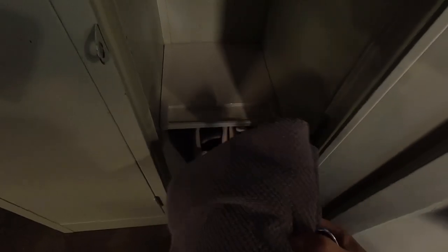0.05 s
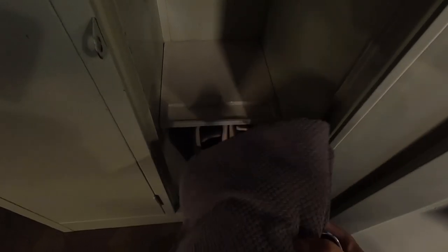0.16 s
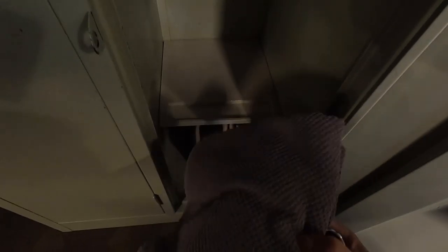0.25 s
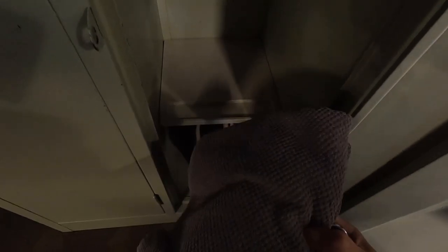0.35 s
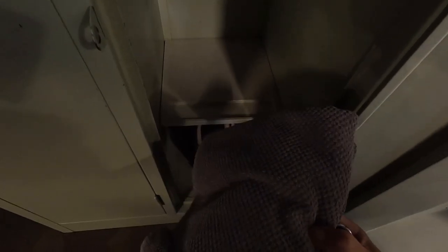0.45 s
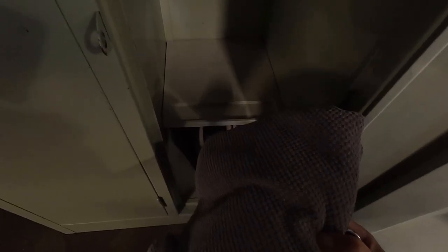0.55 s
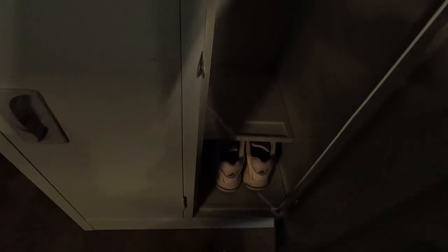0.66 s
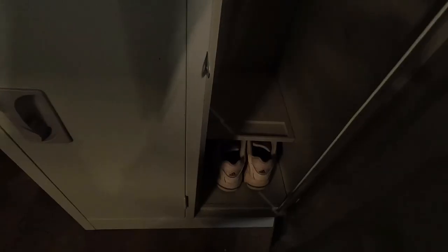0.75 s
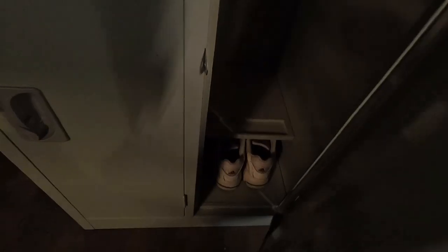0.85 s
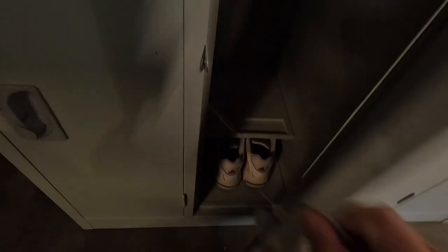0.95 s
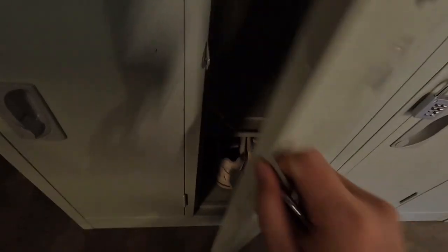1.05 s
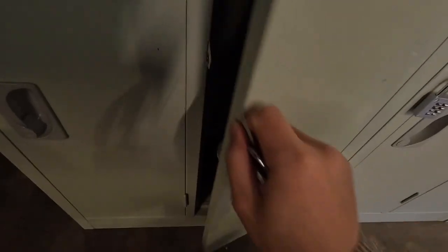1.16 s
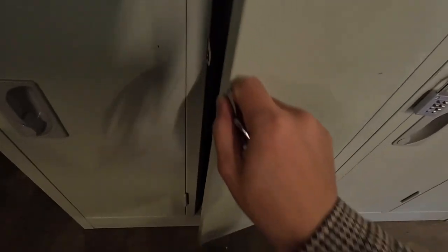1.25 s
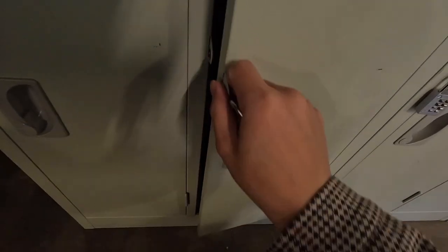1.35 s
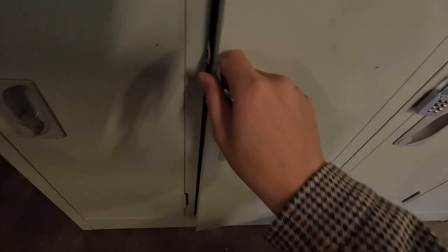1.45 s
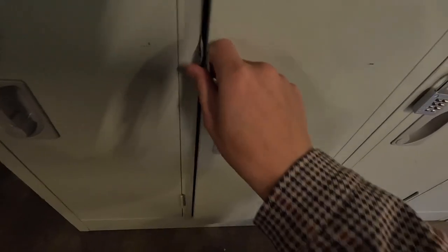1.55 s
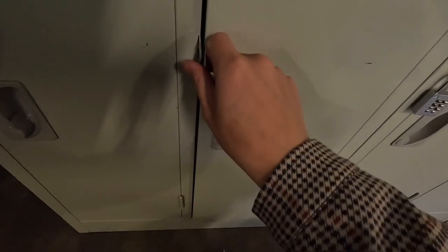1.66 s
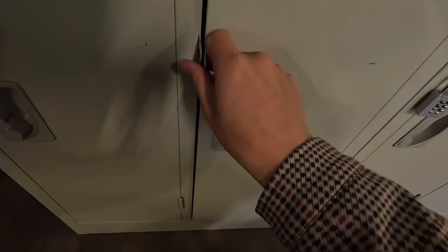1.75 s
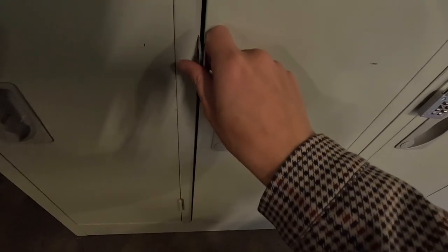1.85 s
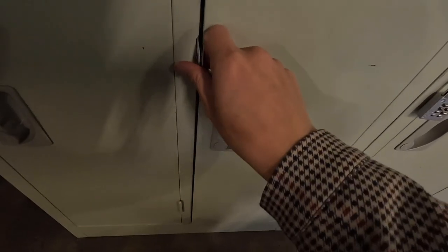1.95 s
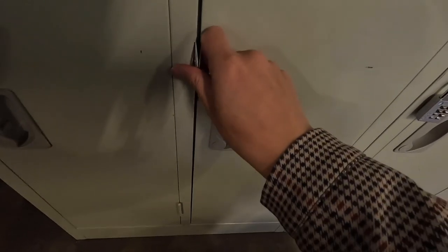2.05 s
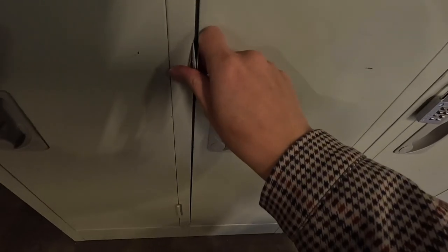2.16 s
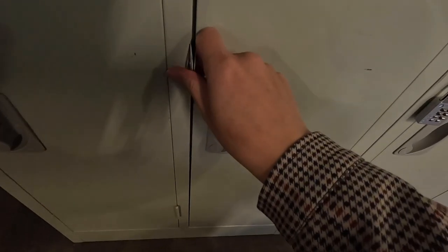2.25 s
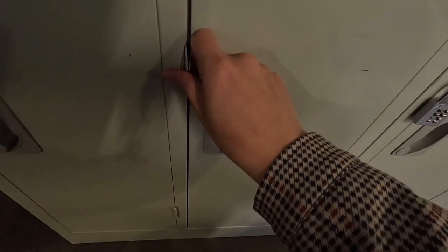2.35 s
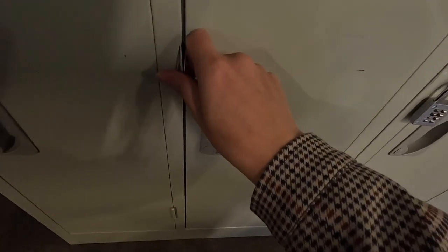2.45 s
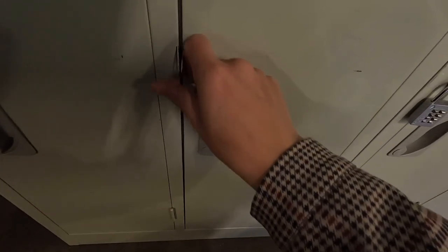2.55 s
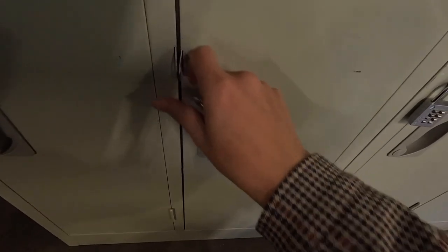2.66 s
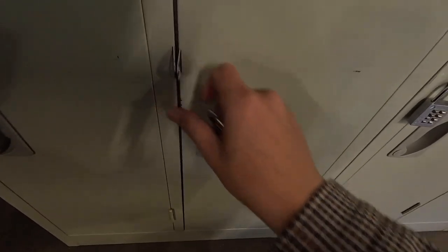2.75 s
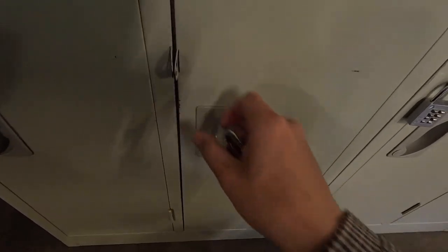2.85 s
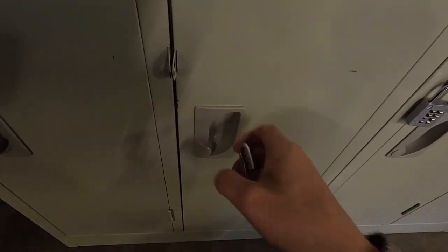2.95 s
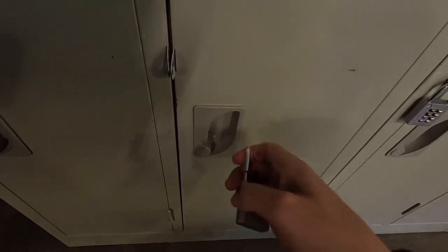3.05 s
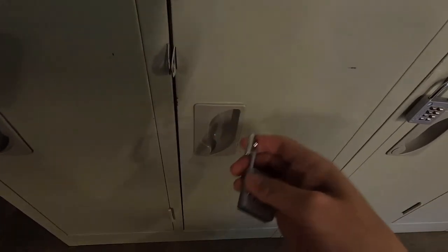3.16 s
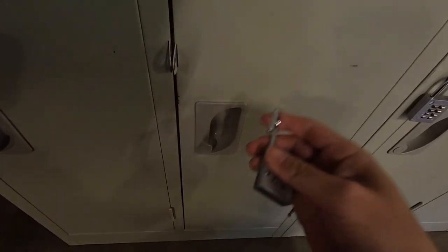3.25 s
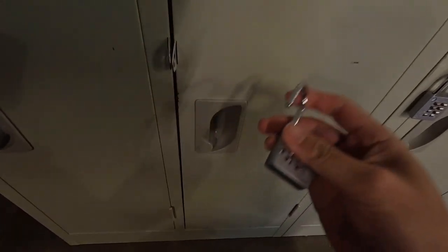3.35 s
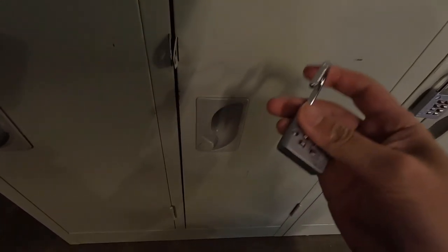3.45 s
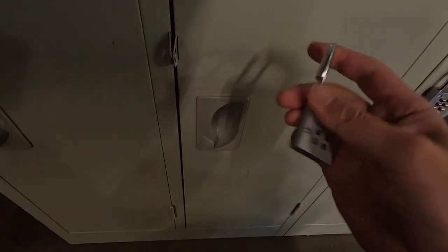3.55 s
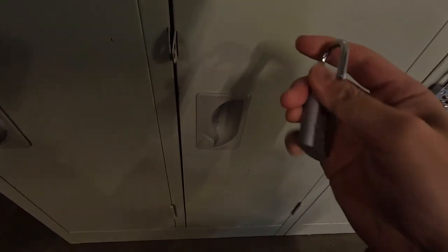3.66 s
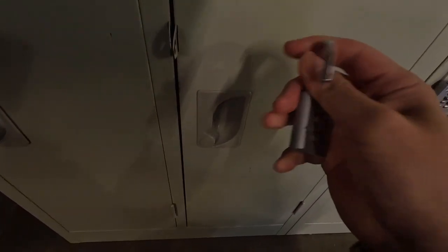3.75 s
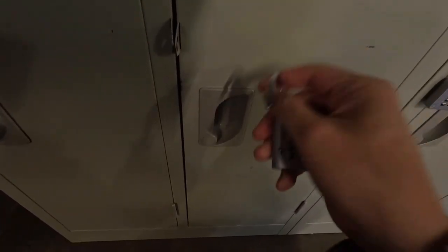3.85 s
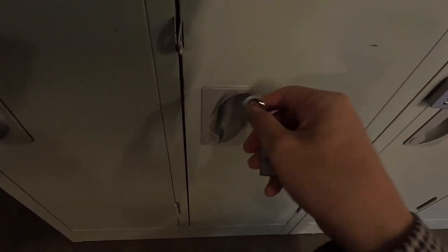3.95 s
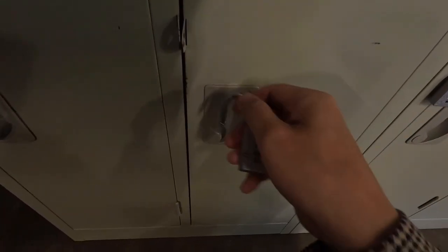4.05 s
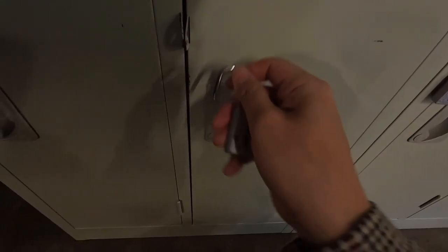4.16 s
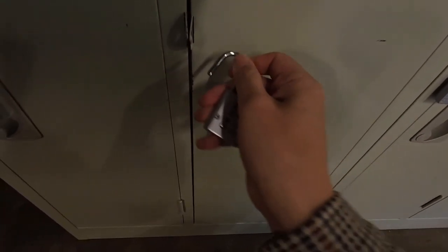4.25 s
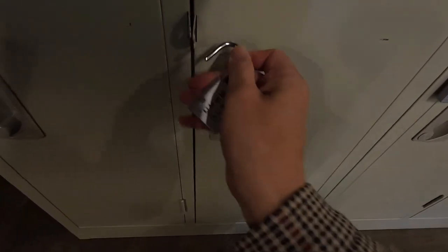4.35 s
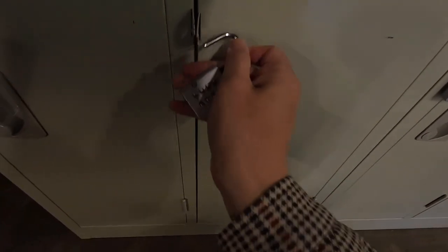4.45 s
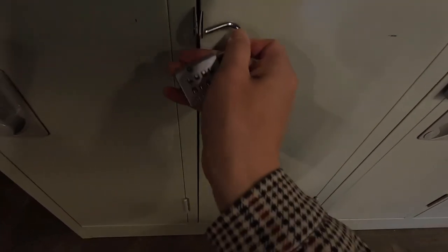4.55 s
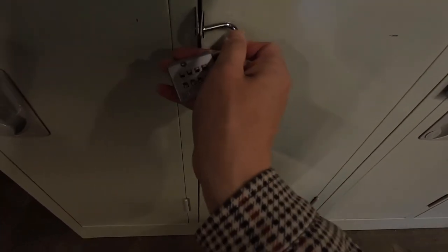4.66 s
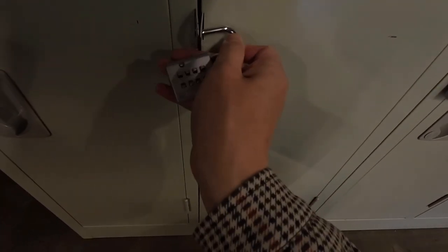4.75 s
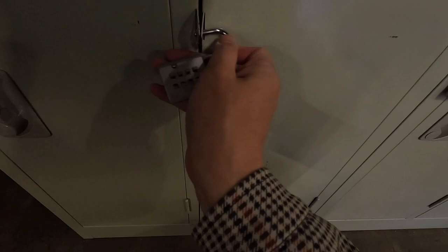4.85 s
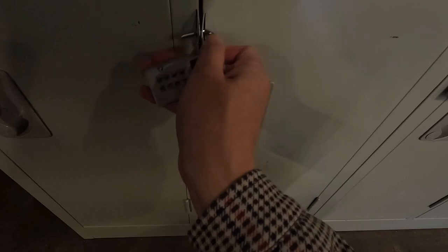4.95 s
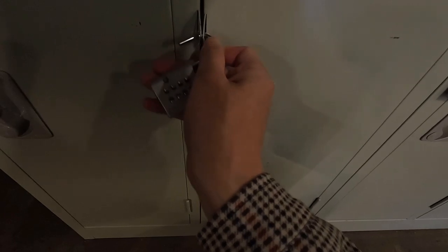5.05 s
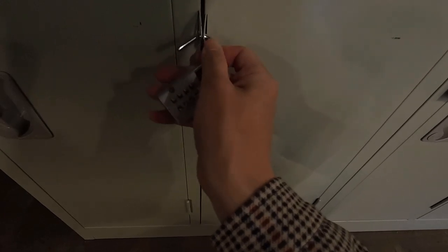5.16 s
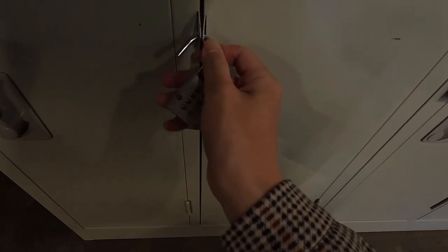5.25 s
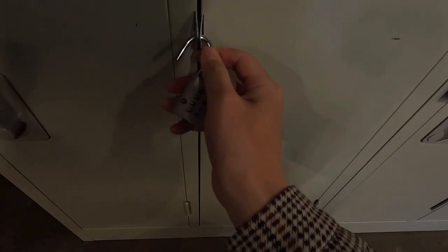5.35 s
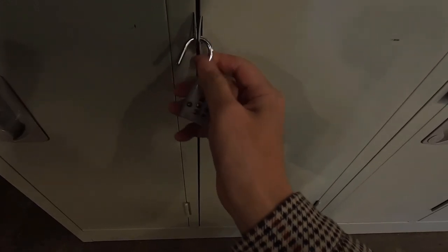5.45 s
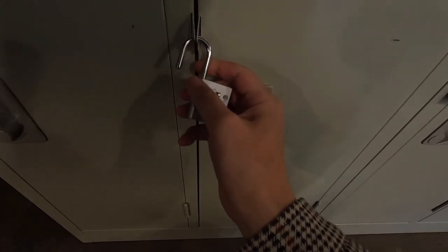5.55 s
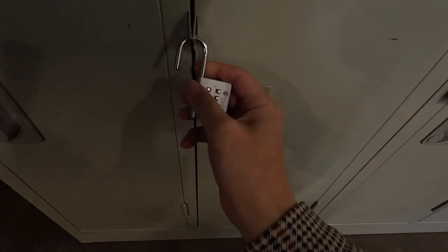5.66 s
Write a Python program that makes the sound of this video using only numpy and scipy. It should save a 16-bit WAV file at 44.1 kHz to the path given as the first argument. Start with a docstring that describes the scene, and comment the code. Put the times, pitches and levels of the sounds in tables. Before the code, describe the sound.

Faint air rumble and cloth movement, then a locker door swings with a brief thin squeak and metallic knocks. It thuds against its frame and is pressed shut with several rapid, boomy clanging hits. Afterwards come only light, dry steel clicks of a padlock being handled, with a couple of soft hollow taps on the door. Close microphone, short indoor reverberation.

```python
"""A small hard room with a low ventilation rumble, heard close up while a sleeve rustles.
A sheet-metal locker door swings on a squeaky hinge, bumps its frame and is pushed shut with a rattling bang.
A combination padlock clicks in the hand, then knocks on the door as its shackle is threaded through the hasp.
Struck metal is decaying sine modes and noise bands; the squeak is a gliding sine.
Rubbing, cloth and air are shaped noise."""
import sys
import numpy as np
from scipy import signal
from scipy.fft import rfft, irfft
from scipy.io import wavfile
from scipy.ndimage import uniform_filter1d

SR = 44100
rng = np.random.default_rng(int(sys.argv[2]) if len(sys.argv) > 2 else 0)


def put_to_file(sound):
    """Save the sound as 16-bit audio at rate SR, in the file named by the first command-line argument."""
    columns = np.atleast_2d(sound).T  # one column per channel
    safe = np.clip(columns, -1, 1)
    whole_steps = np.round(safe * 32767)
    wavfile.write(sys.argv[1], SR, whole_steps.astype(np.int16))


N = 251370
TIME = np.arange(N) / SR
RING_TIME = TIME[:SR]

# Dense ring of the thin sheet:
# (frequency [Hz], relative level [dB], t60 [s], time constant of the build-up [ms])
SHEET_RING = [(90, -10, 1, 18), (162, 0.5, 0.21, 7.8), (320, -5, 0.46, 21), (497, -5.5, 0.28, 14),
              (1000, -5.5, 0.21, 7.2), (1720, -5.5, 0.23, 2.5), (2580, -7.5, 0.17, 1.2),
              (5100, -7.5, 0.18, 1), (7300, -9.5, 0.083, 1), (9470, -31, 0.23, 0.89), (12600, -23, 0.2, 1),
              (16000, -44.5, .15, 1)]


def amp(db):
    """Decibels to gain."""
    return 10 ** (np.asarray(db) / 20)


def at_pitch(rows, hz):
    """The columns of a frequency table, read on a log axis."""
    table_hz, *columns = np.transpose(rows)
    log_hz = np.log(np.maximum(hz, 1))
    return [np.interp(log_hz, np.log(table_hz), column) for column in columns]


def unit(x):
    """Scale to rms 1."""
    return x / np.sqrt(np.mean(x ** 2))


def add(out, s, sound):
    """Mix a sound in at time s."""
    i = int(s * SR)
    n = min(sound.shape[-1], N - i)
    out[:, i:i + n] += sound[..., :n]


def noise(size, gain, wider_db=0):
    """Stereo noise with the spectrum gain(Hz): alike in the bass, wider in the treble."""
    # Stereo width before wider_db and the -3 dB ceiling: (frequency [Hz], side minus mid [dB])
    stereo_width = [(60, -33), (200, -26), (700, -17), (1300, -14), (2500, -7), (8000, -9), (15000, -6)]
    hz = np.fft.rfftfreq(size, 1 / SR)
    mid, side = rfft(rng.standard_normal((2, size))) * gain(hz)
    side = side * amp(np.minimum(at_pitch(stereo_width, hz)[0] + wider_db, -3))
    return unit(irfft(np.array([mid + side, mid - side]), size))


def band(centre_hz, octaves):
    """A flat-topped band with steep edges, as a gain function."""
    return lambda hz: np.exp(-(2 * np.log2((hz + 1) / centre_hz) / octaves) ** 4 / 2)


def fade(t, t60):
    """Exponential decay by 60 dB in t60 seconds."""
    return np.exp(-np.log(1000) * t / t60)


def build_up(ms):
    """Gradual onset of a ring, with its time constant in ms."""
    return 1 - np.exp(-RING_TIME * 1000 / ms)


def ring(hz, t60, t=RING_TIME):
    """One struck mode: a decaying sine."""
    return np.sin(2 * np.pi * hz * t) * fade(t, t60)


def walk(rate):
    """Smooth random drift with a spread of 1, taking about rate new values a second."""
    k = max(int(SR / rate), 1)
    steps = np.repeat(rng.standard_normal(N // k + 1), k)
    return unit(uniform_filter1d(steps, k)[:N])


def strokes(rows, attack_s, release_s):
    """Gain of (start, length, dB) movements: each swells, holds and dies away by 60 dB in release_s."""
    power = 0
    for s, length, db in rows:
        rise = np.clip((TIME - s) / attack_s, 0, 1)
        fall = fade(np.maximum(TIME - s - length, 0), release_s)
        power = power + (amp(db) * rise * fall) ** 2
    return np.sqrt(power)


def air(level_db=-45.5, swell_db=0.4, wider_db=11):
    """Diffuse ventilation rumble: wide noise, gently uneven in level."""
    # Rumble spectrum: (frequency [Hz], relative level [dB])
    rumble = [(12, -46), (20, 6.5), (42, 1), (62, -5.5), (97, -4.5), (128, -9.5), (281, -5), (350, -7.5),
              (412, -19), (447, -10), (655, -27.5), (1800, -24.5), (2780, -37), (3960, -44.5),
              (9220, -54.5), (11800, -54.5), (13500, -76.5)]
    spectrum = lambda hz: amp(at_pitch(rumble, hz)[0])
    return noise(N, spectrum, wider_db) * amp(level_db + swell_db * walk(2.5))


def room(x, wet_db, low_t60=0.37, high_t60=0.35, gap_s=0.0053):
    """Lockers and hard walls return a short diffuse tail, its lows and highs fading separately."""
    low = noise(SR, lambda hz: 1 / (1 + (hz / 600) ** 2)) * fade(RING_TIME, low_t60)
    high = noise(SR, lambda hz: hz / (hz + 500) / (1 + (hz / 11000) ** 2)) * fade(RING_TIME, high_t60)
    # silent for one gap, then rising over another
    tail = (0.39 * low + high) * np.clip(RING_TIME / gap_s - 1, 0, 1)
    return amp(wet_db) * signal.fftconvolve(x, tail / np.linalg.norm(tail[0]), axes=1)[:, :N]


def sleeve(grain_db=2.0, rest_db=-72, silk_share_db=-17.5):
    """Woven cloth rustles as the arm moves; its smooth lining adds a high silky hiss."""
    # Arm movements that ruffle the sleeve: (start [s], length [s], level [dB])
    arm_moves = [(0, 0.14, -66.5), (.62, 0.67, -65), (2.95, 0.21, -68), (3.95, 0.32, -63.5),
                 (4.6, 0.47, -71.5)]
    # Forward reaches that slide the lining: (start [s], length [s], level [dB])
    reaches = [(1.75, 0.29, -72.5), (4.5, 0.49, -73.5)]
    cloth = np.hypot(amp(rest_db), strokes(arm_moves, attack_s=0.017, release_s=1.0))
    sliding = np.hypot(amp(silk_share_db) * cloth, strokes(reaches, attack_s=0.094, release_s=1.5))
    rustle = noise(N, band(4100, 1.79)) * cloth * amp(grain_db * walk(49))
    silk = noise(N, band(12100, .15)) + .6 * noise(N, band(10800, .45))
    return rustle + silk * sliding * amp(grain_db * walk(40))


def wobble(hz=26.0, drift=0.087, level_db=-3):
    """The open door quivers in the hand and fans the air: a deep sine of drifting pitch."""
    # Quivers while the door is held, pulled and swung shut:
    # (start [s], length [s], level before level_db [dB])
    quivers = [(0, 0.52, -35), (.645, 0.13, -27), (.95, .75, -30)]
    swing = np.sin(2 * np.pi * np.cumsum(hz * (1 + drift * walk(25))) / SR)
    return unit(swing) * amp(level_db) * strokes(quivers, attack_s=0.047, release_s=0.65)


def rubbing(slip_db=2.0, top_hz=6000, low_hz=500):
    """Painted steel sticks and slips, stirring the sheet in uneven spurts."""
    # Dry metal rubbing at the hinge, frame and hasp: (start [s], length [s], level [dB])
    rubs = [(.65, 0.53, -56.5), (.788, 0.027, -38.5), (.87, 0.026, -49), (1.87, .16, -53.5),
            (4.83, 0.47, -62.5)]

    def spectrum(hz):
        bass_cut = hz / (hz + low_hz)
        tilt = 1 / np.sqrt(hz + low_hz)
        return amp(at_pitch(SHEET_RING, hz)[0]) * bass_cut * tilt / (1 + (hz / top_hz) ** 2)

    sheet = noise(N, spectrum)
    slips = amp(2 * slip_db * np.tanh(walk(220) / 2))  # soft limit at twice slip_db
    return unit(sheet * slips) * strokes(rubs, attack_s=0.011, release_s=0.18)


def hinge_ticks(centre_hz=2300, octaves=1.9, t60=0.022):
    """The stuck hinge pin breaks free with short dry cracks of band noise."""
    # Cracks: (time [s], level [dB])
    cracks = [(.6640, -34), (.759, -43.5)]
    out = np.zeros((2, N))
    for s, db in cracks:
        add(out, s, amp(db) * noise(SR, band(centre_hz, octaves)) * fade(RING_TIME, t60))
    return out


def hinge(flutter_db=5.0, unsteady=0.021):
    """The dry hinge pin sings one thin, unsteady note that climbs as the door picks up speed."""
    low_hz, high_hz = 12020, 13500
    climb_at_s, climb_scale_s = 0.807, 0.0076  # midpoint and time scale of the S-shaped glide
    climb = (1 + np.tanh((TIME - climb_at_s) / climb_scale_s / 2)) / 2
    hz = low_hz + (high_hz - low_hz) * climb
    phase = 2 * np.pi * np.cumsum(hz * (1 + unsteady * walk(1500))) / SR
    squeak = (0.76, 0.038, -41)  # start [s], length [s], level [dB]
    level = strokes([squeak], attack_s=0.0032, release_s=.2)
    return unit(np.sin(phase) * amp(flutter_db * walk(570))) * level


def ticks(count=3, contact_ms=3.2, spread_db=2.5, slack=0.22):
    """The loose shackle rocks to and fro in each jiggle: light clicks, as rows for padlock()."""
    # Jiggles in the fingers:
    # (start [s], length [s], peak before random spread [dB], brightness [dB per octave])
    jiggles = [(2.948, 0.059, -40, -5), (2.991, .06, -38.5, -2), (3.44, 0.072, -53.5, 9),
               (3.642, .012, -36, 11), (3.941, 0.052, -40.5, 2), (4.039, .03, -32, 4),
               (4.209, 0.089, -36.5, 8.5), (5.204, 0.056, -46.5, -6)]
    rows = []
    for start, length, db, bright_db in jiggles:
        # each tick comes late by up to slack, a share of the gap
        times = start + length * (np.arange(count) + slack * rng.random(count)) / count
        levels = db + spread_db * rng.standard_normal(count)
        rows += [(s, level, bright_db, contact_ms) for s, level in zip(times, levels)]
    return rows


def padlock(level_db=0, spot_db=1.5, detune=0.01, ear_db=5.0, pan_db=-0.8, grit=0.65, pivot_hz=4000,
            low_hz=2000, top_hz=13500, snap_db=-4, scatter_db=-13, scatter_t60=0.12):
    """Steel parts meet in a brief gritty contact; the grip shifts the damped modes from click to click."""
    # Clicks: (time [s], peak [dB], brightness [dB per octave], time constant of the contact [ms])
    clicks = [(0.8369, -18, 3, 4), (.8415, -19.5, 12, 2.5), (2.0785, -8, 7.5, 2.7), (2.109, -13.5, 5, 1),
              (2.132, -18, 9, 2), (2.1692, -17, 7, 1.3), (2.9651, -32.5, -8, 4.7),
              (3.0021, -25.5, -4.5, 4.4), (3.0448, -23.5, -1.5, 1.8), (3.2257, -22.5, -5, .3),
              (3.6554, -14, 5, 2.4), (3.9286, -25.5, 9.5, 5.8), (4.021, -25, 4, 6.5),
              (4.0298, -18.5, 14, 4), (4.031, -12.5, -7.5, 2.3), (4.071, -30, -4, 5.4),
              (4.1320, -24.5, 5.5, 4.5), (4.2284, -13.5, -4.5, 3.2), (4.7118, -28.5, -12, 1.6),
              (5.014, -23.5, 0.5, 2.9), (5.1555, -33.5, -6, 2.2), (5.1814, -30.5, -10, 2)]
    # Body modes, damped by the fingers: (frequency before detuning [Hz], relative level [dB], t60 [s])
    lock_modes = [(2265, -21, 0.014), (2603, -4.5, 0.012), (3280, 6, 0.0071), (3527, 1, 0.012),
                  (4214, -8.5, 0.0085), (5020, -6.5, 0.0072), (5700, -8.5, 0.0082), (6660, -19.5, 0.016),
                  (6900, -10.5, 0.013), (7630, -13, 0.02), (8390, -15, 0.012), (10140, -22, 0.0122),
                  (11350, -29, .009), (12300, -37.5, 0.014)]
    # Faint longer ring of the steel shackle: (frequency [Hz], relative level [dB], t60 [s])
    shackle_modes = [(3270, -37.5, .22), (3720, -32, 0.18), (3970, -46.5, .5), (4150, -36, 0.12),
                     (7380, -47, 0.22), (8170, -41.5, .16)]
    out, t = np.zeros((2, N)), RING_TIME[:SR // 4]
    hz, mode_db, t60 = np.transpose(lock_modes + shackle_modes)
    gripped = np.arange(len(hz)) < len(lock_modes)
    signs = (-1) ** np.arange(len(hz))
    # so small a body radiates no bass
    radiation = signal.butter(3, [low_hz, top_hz], "band", fs=SR, output="sos")
    pan = np.array([[pan_db], [-pan_db]]) / 2
    for s, db, bright_db, contact_ms in clicks + ticks():
        shift, spot, left, right = rng.standard_normal((4, len(hz)))
        modes = ring((hz * (1 + detune * shift * gripped))[:, None], t60[:, None], t)
        tilt_db = bright_db * np.log2(hz / pivot_hz)
        gains = amp(mode_db + spot_db * spot + tilt_db + ear_db * np.array([left, right]))
        body = gains * signs @ modes
        scrape = rng.standard_normal(SR // 50) * np.exp(-t[:SR // 50] * 1000 / contact_ms)
        contact = grit * scrape / np.linalg.norm(scrape)
        contact[0] += 1  # the first hard touch
        click = unit(signal.fftconvolve(body, contact[None], axes=1)[:, :len(t)])

        def colour(f):
            tilt = bright_db * np.log2((f + 1) / pivot_hz)
            return amp(tilt + at_pitch(lock_modes, f)[0] / 2) / (1 + (f / 7000) ** 2)

        # the loose dials buzz briefly, and the nearby door scatters the sound back
        snap = unit(noise(len(t), colour) * np.exp(-t * 1000 / (contact_ms + 1.0)))
        scatter = unit(noise(len(t), colour) * fade(t, scatter_t60))
        click = signal.sosfilt(radiation, click + amp(snap_db) * snap + amp(scatter_db) * scatter)
        add(out, s, amp(db + level_db + pan) * click / np.abs(click.mean(0)).max())
    return out


def spot_ring(hz, spread=.05, t60=0.14, build_cycles=8, count=5):
    """A cluster of close, beating modes where the sheet is struck, a little different in each ear."""
    offsets = np.linspace(-1.4, 1.4, count) + .3 * rng.standard_normal(count)
    modes = ring(hz * (1 + spread * offsets)[:, None], t60)
    gains = rng.choice([-1, 1], count) * (1 + 0.085 * rng.standard_normal((2, count)))
    return np.sqrt(2 / count) * (gains @ modes) * (1 - np.exp(-RING_TIME * hz / build_cycles))


def locker(panel_db=-1, spot_db=2, ripple_db=3, ripple_hz=30, bass_hz=440, treble_hz=1500):
    """Each blow bends the door, rings its panels and spreads into a dense clang whose lows build up slowly."""
    # Blows: (time [s], level [dB], weight as extra bass [dB], hardness as extra treble [dB],
    # resonance of the struck spot [Hz], level of that resonance relative to the blow [dB])
    blows = [(0.8374, -36, -1, 11, 2270, 11.5), (.866, -37.5, -6, -14, 347.7, 19),
             (.891, -40, -15, 16, 3140, -1), (.908, -43.5, -5, 0, 350, 8), (1.040, -58, 9, 3, 1463, 12.5),
             (1.118, -50.5, 0, 3, 3950, -2), (1.729, -24.5, -5, -4.5, 142, 14),
             (1.872, -40.5, 6.5, -11, 1384, -1), (1.945, -44, 9.5, -15, 149.8, 1),
             (2.037, -26, 6.5, -8.5, 211, 0), (2.057, -21, -1, -1, 714, -9),
             (2.0784, -20, 2.5, 1.5, 984, 4), (2.108, -25, -11.5, 1.5, 1008, 3),
             (2.124, -20.5, -4.5, 2, 157, -2), (2.146, -24.5, -8, 0, 1003, 6),
             (2.588, -60, 3, 4.5, 5300, -3), (2.6873, -39, 3, 2.5, 972, 2.5),
             (4.7123, -45, 9.5, 6, 2220, 6), (4.8467, -59.5, 10, 11.5, 4880, 3),
             (5.0145, -32.5, 0, 3, 345, 12), (5.040, -44, -3, -25, 678, 21.5),
             (5.1812, -48.5, -2.5, 5.5, 3770, 2)]
    # Lowest bending modes of the whole door: (frequency [Hz], relative level [dB], t60 [s])
    flex_modes = [(30.5, -8, 0.96), (44, -8.5, 0.8), (58.14, -1, 0.89), (72.2, -3, 0.5), (83.1, -8.5, 0.7)]
    # Panel modes: (frequency [Hz], level before panel_db and random spread [dB], t60 [s])
    panel_modes = [(121, 8, 0.27), (139.5, -3, 0.42), (156.6, 1, 0.42), (200.2, -4.5, 0.44),
                   (248.5, -11.5, 0.85), (292.6, -14.5, 0.81), (335, -12.5, 0.44), (377, -24.5, 0.61),
                   (524, -7.5, 0.17), (577, -23, 0.75), (664, -11.5, 0.44), (729, -15.5, .35),
                   (973, -11, 0.36), (1031, -11, 0.3), (1192, -25, 0.44), (1388, -16, 0.36),
                   (2400, -12, 0.2), (2480, -20, 0.13)]
    # a heavy blow flexes the whole door, and far more so once it sits in its frame
    seated_s, flex_open_db, flex_seated_db = 2.0, -9, -1

    centres = 90 * 2 ** (np.arange(16) / 2)  # half-octave bands [Hz]
    # the crowded modes of the sheet make some narrow bands stand out in every blow
    peaks = rng.standard_normal(SR // 10)

    def ripple(hz):
        height = np.interp(hz / ripple_hz, np.arange(len(peaks)), peaks)
        return amp(ripple_db * height * hz / (hz + 400))

    clang = np.array([noise(2 * SR, lambda hz: band(f, .5)(hz) * ripple(hz)) for f in centres])
    sheet_db, sheet_t60, build_ms = (c[:, None] for c in at_pitch(SHEET_RING, centres))
    shape = amp(sheet_db) * fade(RING_TIME, sheet_t60) * build_up(build_ms)
    mode_hz, mode_db, mode_t60 = np.transpose(panel_modes)
    panel_build_ms = at_pitch(SHEET_RING, mode_hz)[2][:, None]
    panels = ring(mode_hz[:, None], mode_t60[:, None]) * build_up(panel_build_ms)
    flex = sum(amp(db) * ring(hz, t60) for hz, db, t60 in flex_modes)

    out = np.zeros((2, N))
    for s, db, weight_db, hard_db, spot_hz, ring_db in blows:
        def force_db(hz):
            bass = weight_db / (1 + (hz / bass_hz) ** 2)
            treble = hard_db / (1 + (treble_hz / hz) ** 2)
            return db + bass + treble

        start = rng.integers(SR)  # a fresh stretch of the clang noise
        bands = amp(force_db(centres))[:, None] * shape
        add(out, s, np.einsum("bt,bct->ct", bands, clang[..., start:start + SR]))
        # every contact spot favours other panel modes
        favour_db = spot_db * rng.standard_normal(len(mode_hz))
        add(out, s, amp(force_db(mode_hz) + mode_db + panel_db + favour_db) @ panels)
        flex_db = weight_db + (flex_seated_db if s > seated_s else flex_open_db)
        add(out, s, amp(db + flex_db) * flex + amp(db + ring_db) * spot_ring(spot_hz))
    return out


def scene():
    """Door and padlock in the room, both slightly to the right; the hinge is further right."""
    background = wobble() + sleeve() + air()
    door = (locker() + rubbing() + hinge_ticks()) * amp(np.array([[-.4], [.4]]))
    door[0] = np.roll(door[0], 1)  # the left microphone is a little further off
    door = door + hinge() * amp(np.array([[-4], [1]]))
    lock = padlock()
    door_in_room = door + room(door, wet_db=-15.0)
    lock_in_room = lock + room(lock, wet_db=-24.5, high_t60=0.45)
    return door_in_room + lock_in_room + background


def record(dry):
    """Drop the deepest rumble with a high-pass and cut the top with a steep low-pass."""
    dry = signal.sosfilt(signal.butter(2, 14, "high", fs=SR, output="sos"), dry)
    return signal.sosfilt(signal.ellip(8, .2, 80, 15300, fs=SR, output="sos"), dry)


dry = scene()
out = record(dry)
put_to_file(out)
```